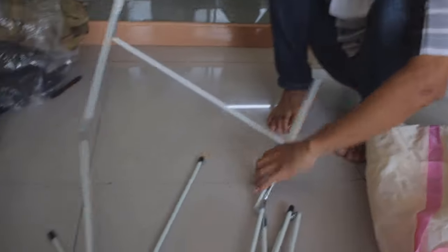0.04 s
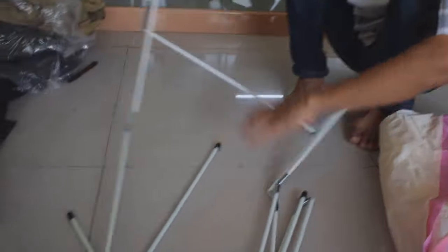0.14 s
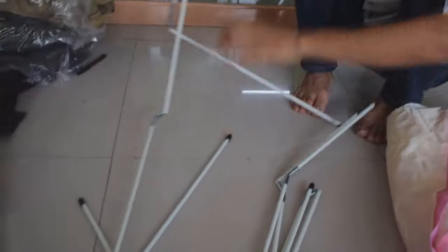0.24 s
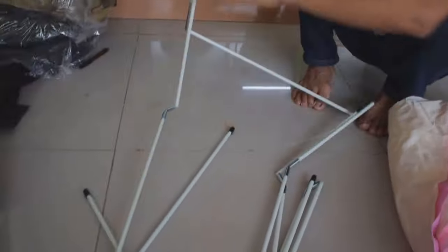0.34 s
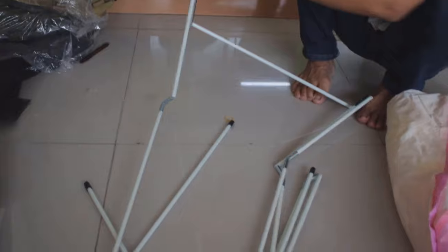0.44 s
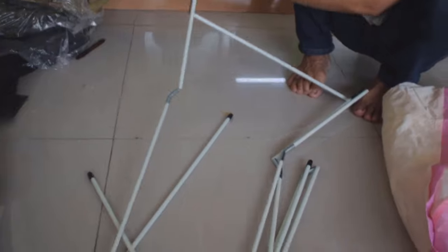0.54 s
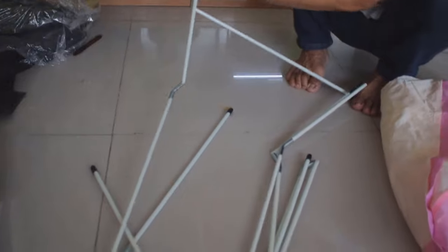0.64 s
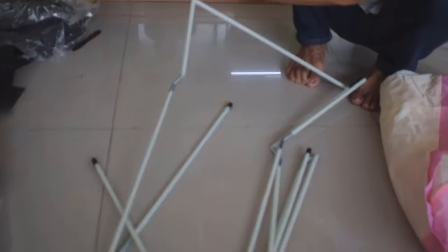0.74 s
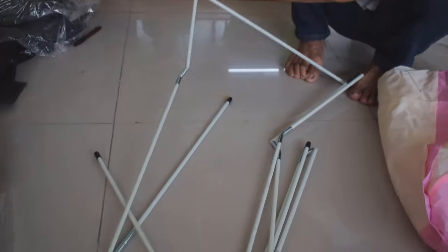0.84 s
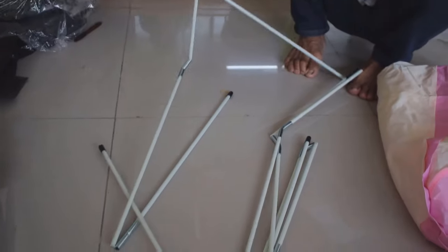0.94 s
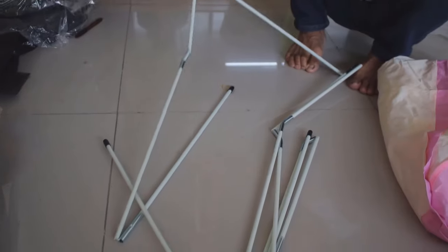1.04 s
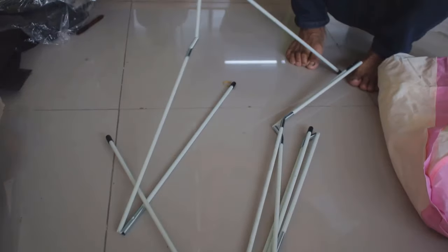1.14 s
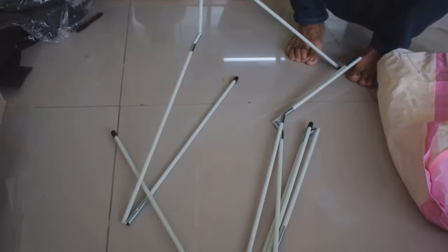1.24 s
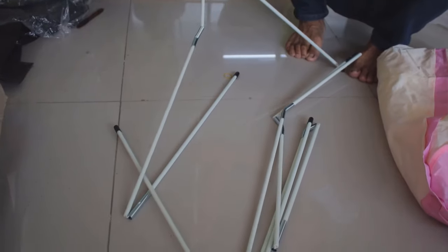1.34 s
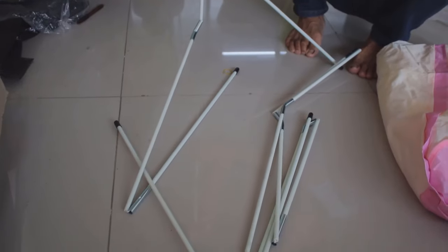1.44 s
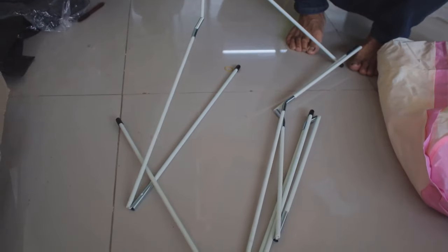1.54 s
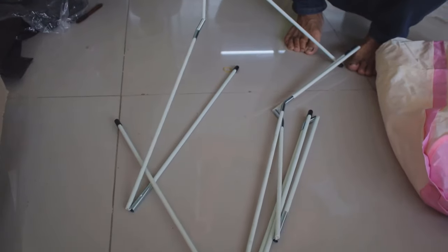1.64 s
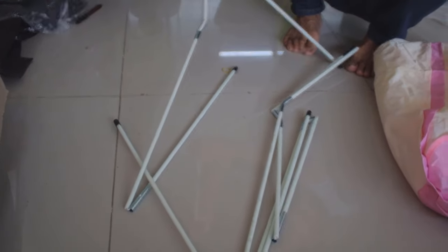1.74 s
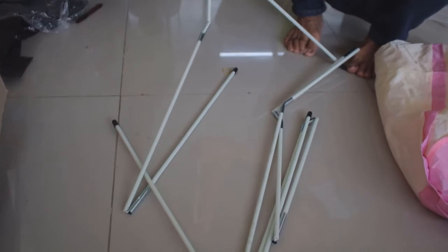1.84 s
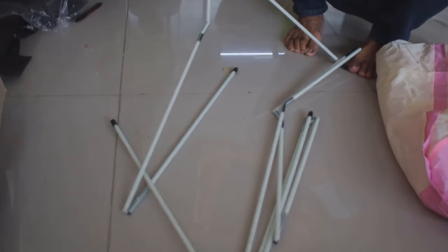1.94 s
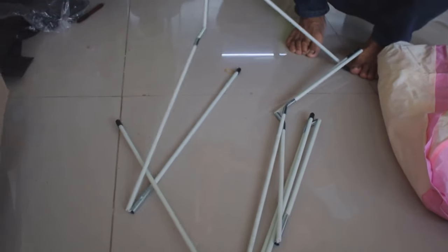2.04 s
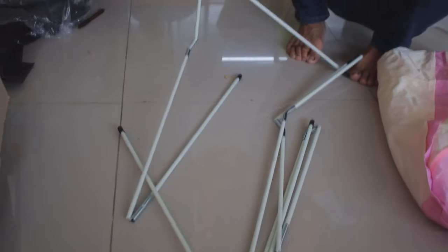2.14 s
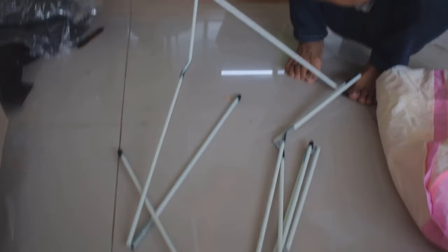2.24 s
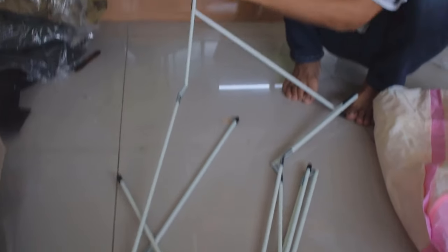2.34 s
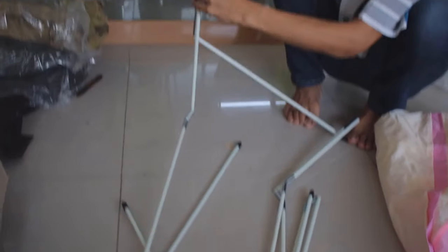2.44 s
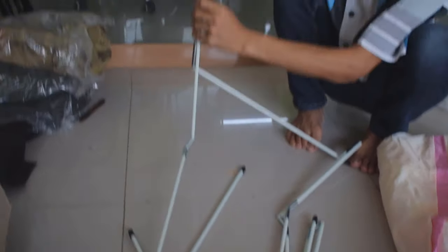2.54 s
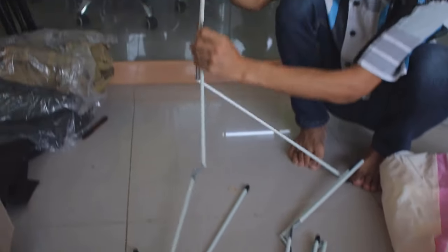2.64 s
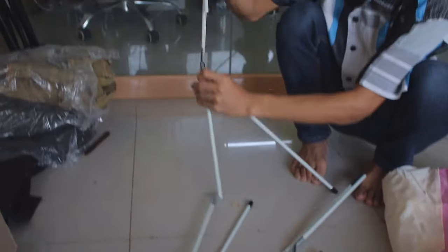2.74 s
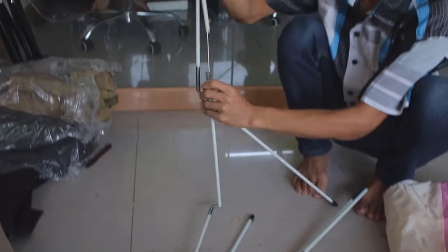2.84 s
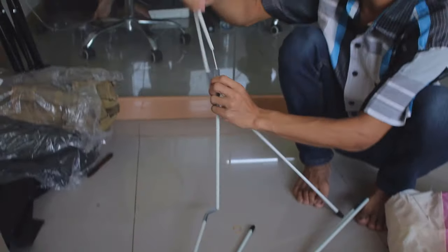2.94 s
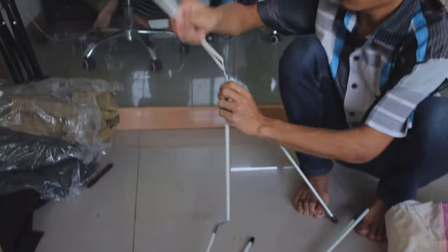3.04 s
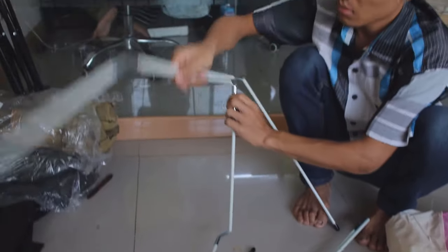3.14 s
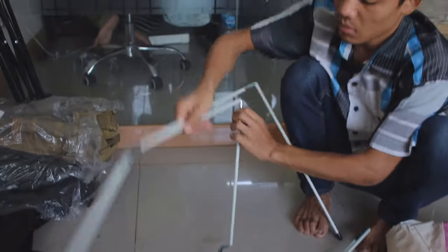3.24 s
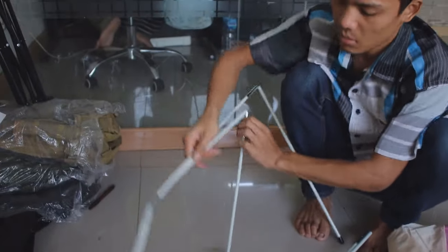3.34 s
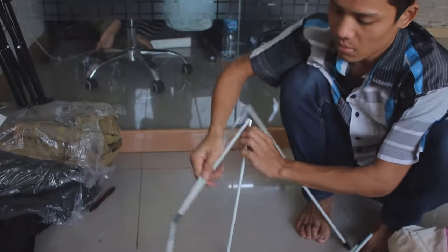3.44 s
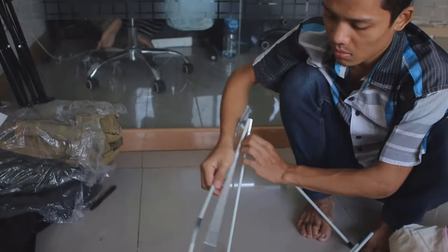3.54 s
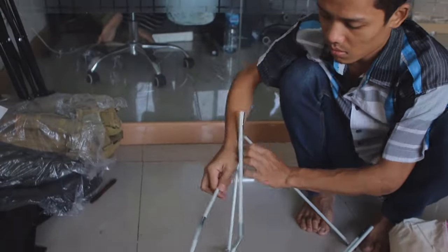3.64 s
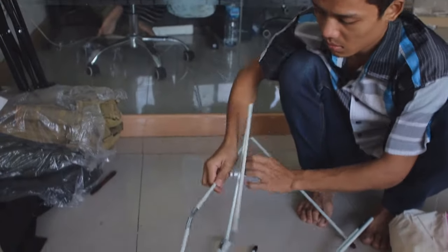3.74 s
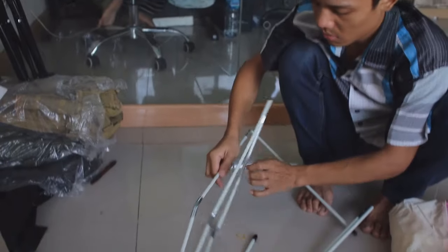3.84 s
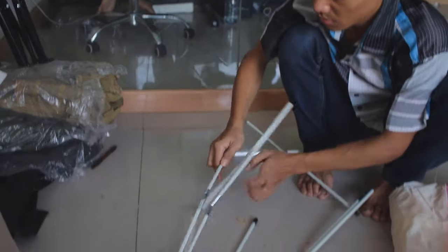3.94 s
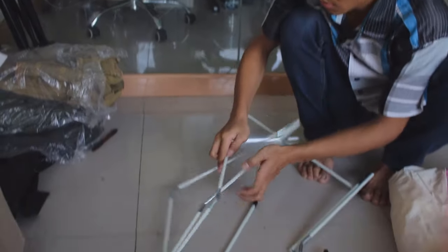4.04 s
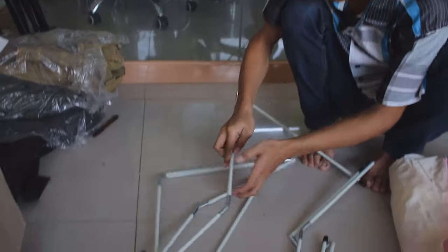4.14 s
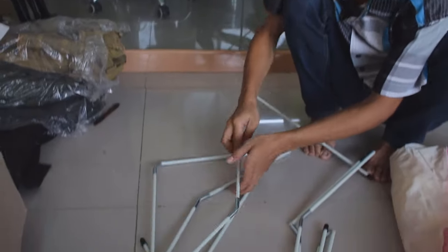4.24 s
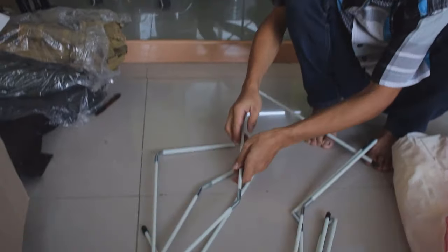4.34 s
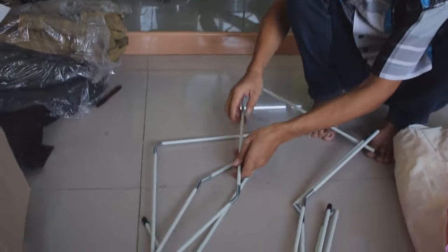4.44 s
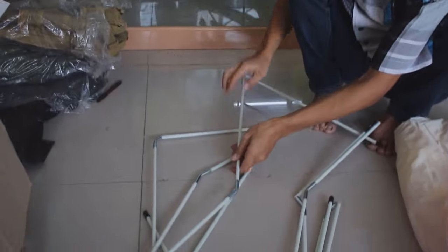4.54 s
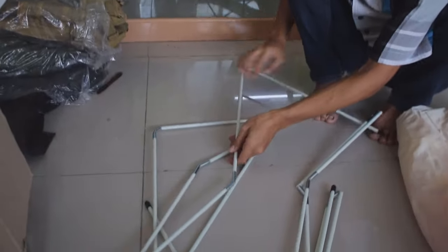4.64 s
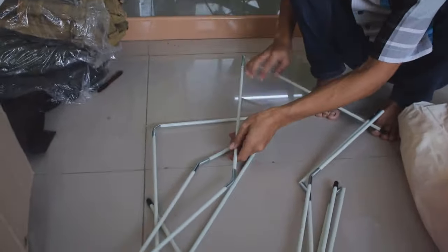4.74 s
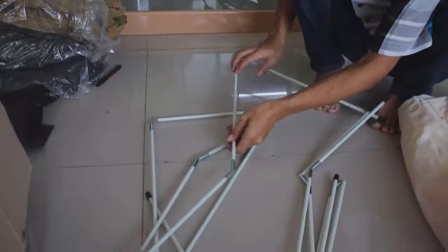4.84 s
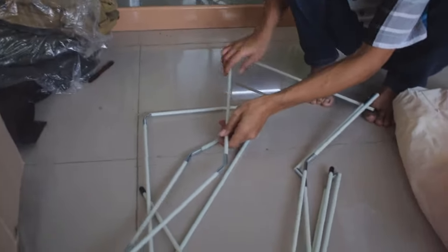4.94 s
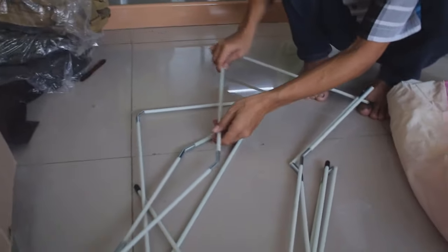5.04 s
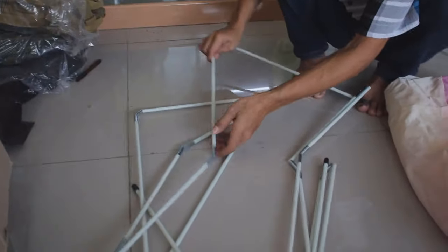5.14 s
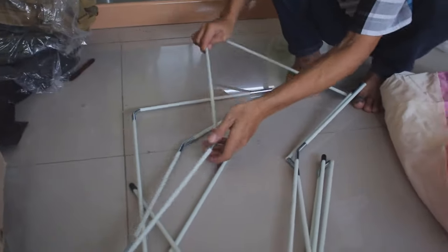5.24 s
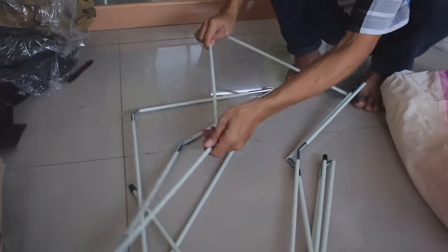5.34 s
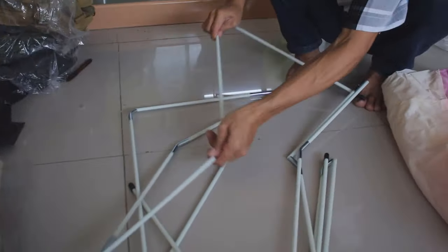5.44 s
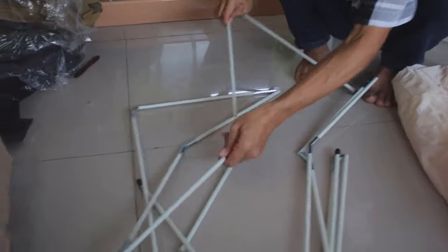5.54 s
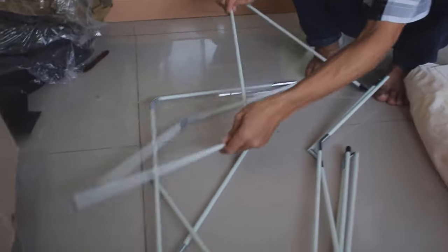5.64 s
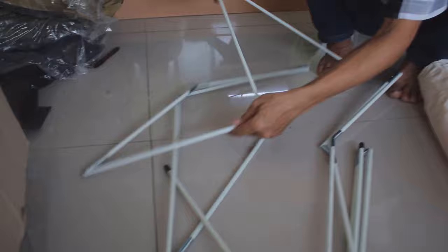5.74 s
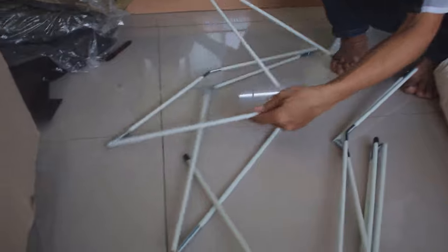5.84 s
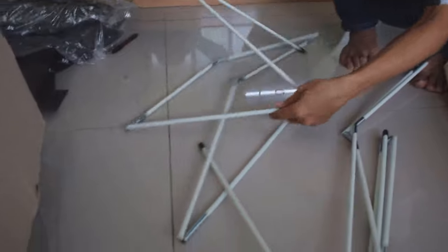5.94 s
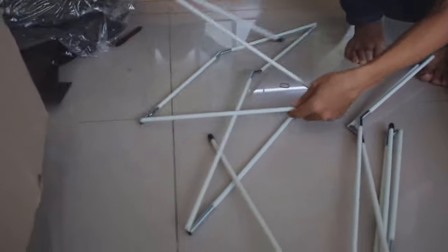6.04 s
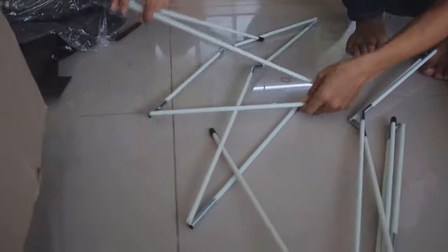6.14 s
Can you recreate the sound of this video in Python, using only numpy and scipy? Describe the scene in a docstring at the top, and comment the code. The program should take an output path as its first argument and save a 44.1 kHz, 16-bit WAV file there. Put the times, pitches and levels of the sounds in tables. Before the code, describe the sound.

Thin hollow rods click and rattle, go nearly quiet, then crash together in sharp bursts on a tiled floor above faint motor-like humming.

```python
"""In a hard, echoing room with a tiled floor, jointed fibreglass poles with metal sleeves knock together.
Knocks, floor thumps and a loose rattle come from impulsive contacts exciting modal resonators; sleeves ring on.
A wavering harmonic series makes a low motor-like hum, and filtered noise makes the room noise.
A mono microphone with a fast gain control and overload picks it up."""
import sys
import numpy as np
from scipy import signal
from scipy.fft import rfft, irfft
from scipy.io import wavfile

SR = 44100
rng = np.random.default_rng(int(sys.argv[2]) if len(sys.argv) > 2 else 0)


def volts_from_db(level):
    """Convert decibel levels to linear amplitude ratios."""
    exponent = np.asarray(level, float) / 20
    return 10 ** exponent


def store_wav(level_fs):
    """Save 16-bit WAV to argv[1]."""
    pcm = np.round(np.clip(np.atleast_2d(level_fs), -1, 1) * 32767)
    wavfile.write(sys.argv[1], SR, pcm.T.astype(np.int16))


N = 272626


def rms_one(x):
    """Normalisation: scale a signal to an rms of 1."""
    return x / np.sqrt(np.mean(x ** 2) + 1e-20)


def in_time(rows):
    """Linear interpolation: read the columns of a timed table sample by sample."""
    seconds, *columns = np.transpose(rows)
    return [np.interp(np.arange(N) / SR, seconds, column) for column in columns]


def at_hz(points, hz):
    """Interpolation on a logarithmic frequency axis: read a (Hz, value) line."""
    points = np.array(points)
    return np.interp(np.log(hz), np.log(points[:, 0]), points[:, 1])


def drift(rate_hz):
    """Slow random modulation: noise through two equal one-pole low-passes, scaled to rms 1."""
    thin = 40  # one drawn value for every 40 samples
    r = np.exp(-2 * np.pi * thin * rate_hz / SR)
    noise = rng.standard_normal(N // thin + 2002)
    slow = signal.lfilter([1], [1, -2 * r, r * r], noise)[2000:]
    return np.interp(np.arange(N) / thin, np.arange(len(slow)), rms_one(slow))


def ring(clicks, hz, width_hz):
    """Damped resonance: two poles, with zeros at 0 Hz and SR / 2; a unit click rings at height about 1."""
    r = np.exp(-np.pi * width_hz / SR)
    w = 2 * np.pi * hz / SR
    return signal.lfilter([.5, 0, -.5], [1, -2 * r * np.cos(w), r * r], clicks + 1e-18)


def coloured(x, spectrum):
    """Linear filtering in the frequency domain: shape a sound by a (Hz, dB) line."""
    hz = np.maximum(np.fft.rfftfreq(len(x), 1 / SR), 1)
    return irfft(rfft(x) * volts_from_db(at_hz(spectrum, hz)), len(x))


# Course of the hum. Each row: time in seconds, rms level in dB before flutter.
HUM_LEVEL = [(0.0, -50), (0.3, -35), (1.22, -47), (2.62, -32.5), (4.1, -42.5), (4.41, -37.5), (5.6, -33.5),
             (6.18, -26)]
# Harmonics of the hum. Each row: multiple of the fundamental, relative level in dB.
HUM_ORDERS = [(1, -7.5), (2, -2), (3, -9), (4, -11), (5, -12.5), (6, -9)]


def hum(level_db, centre_hz=60.25, waver=0.03055, flutter_db=4.5, rough_rad=1.0):
    """Harmonic synthesis: a wavering fundamental whose orders each swell and roughen on their own."""
    phase = 2 * np.pi * np.cumsum(centre_hz * (1 + waver * drift(3.54))) / SR
    drone = np.zeros(N)
    for multiple, db in HUM_ORDERS:
        swell = volts_from_db(db + flutter_db * drift(6.8))
        drone += swell * np.sin(multiple * phase + rough_rad * drift(12))
    return volts_from_db(level_db) * rms_one(drone)


# Spectrum of the room noise. Each row: frequency in Hz, relative level in dB per Hz.
AIR_SPECTRUM = [(18, -31), (30, -14), (59, -37), (144, -21), (178, -7.5), (352, -6.5), (609, -4.5),
                (792, -54), (3010, -12), (15700, -95)]


def room_noise(mean_db=-40, sway_db=2.5):
    """Coloured noise: a random signal shaped by a spectrum, its level swaying slowly."""
    air = rms_one(coloured(rng.standard_normal(N), AIR_SPECTRUM))
    return volts_from_db(mean_db + sway_db * drift(8.8)) * air


# Steady handling of the bundle.
# Each row: time in seconds, middle-mode level in dB, extra level of the high modes in dB.
HANDLING = [(0.0, -18.5, -5.5), (0.45, -35.5, 4), (0.72, -36.5, 5), (1.1, -40, -7), (1.285, -36.5, 3),
            (1.4, -44, -3), (1.9, -49, 5), (2.2, -41.5, 2), (2.43, -40.5, 9), (2.58, -32, 3),
            (2.72, -29.5, -6), (3.26, -35.5, 4), (3.44, -29, -18), (3.87, -38.5, -5), (4.1, -26.5, -9),
            (4.9, -31, -26), (5.16, -31.5, -20), (5.3, -28, -7), (5.5, -24, -6), (6.18, -16.5, -14)]
# Bursts of clatter as rods tumble or are dragged.
# Each row: start in seconds, time from start to decay in seconds, levels of low, middle and high modes in dB.
BURSTS = [(0.0, 0.013, -29, -20.5, -31), (0.254, 0.078, -34.5, -24, -40), (0.806, 0.014, -22.5, -24.5, -31),
          (2.799, 0.065, -22, -15, -23), (3.471, 0.092, -6.5, -7.5, -5), (3.624, 0.32, -28, -42, -43),
          (3.879, 0.013, -16.5, -48, -54), (4.212, 0.082, -17.5, -6.5, -7.5),
          (4.298, 0.089, -14.5, -3.5, -6.5), (5.812, 0.074, -26.5, -18.5, -14),
          (5.928, 0.143, -14.5, -6, -11), (6.143, 0.1, -20, -12.5, -19)]


def bustle(pivot_db=-35, rise_s=0.01, fall_db_per_s=169.5):
    """Power addition of incoherent sources: levels of three mode groups from handling and bursts."""
    middle_db, bright_db = in_time(HANDLING)
    above_db = middle_db - pivot_db
    low_db = -36 + 0.53 * above_db
    high_db = -40.5 + 1.8 * above_db + bright_db  # stronger handling is brighter
    power = volts_from_db([low_db, middle_db, high_db]) ** 2
    for start_s, hold_s, *modes_db in BURSTS:
        t = np.arange(N) / SR - start_s
        fall = volts_from_db(-fall_db_per_s * np.maximum(t - hold_s, 0))
        shape = np.clip(t / rise_s, 0, 1) * fall
        power = power + (volts_from_db(modes_db)[:, None] * shape) ** 2
    return 10 * np.log10(power)


# Modes of rods and sleeves, which the knocks excite as well.
# Each row: frequency in Hz, bandwidth in Hz, relative level in dB.
POLE_MODES = [(437, 320, -3.5), (659, 316, -1.5), (1006, 242, 0), (1250, 250, -4), (1500, 283, -5.5),
              (1950, 1050, 6), (2606, 280, -10), (3129, 890, 2.5), (4033, 710, 2), (4750, 480, -7.5),
              (5316, 620, 1), (5990, 1040, 8.5), (6906, 220, -1.5), (7590, 280, -1), (8270, 98, -7.5),
              (8970, 153, -6.5), (9590, 244, -9), (11930, 190, -12.5), (11850, 410, -51), (12750, 400, -28)]


def rattle(low_db, middle_db, high_db, base_per_s=500, clump_db=3.5, shared=0.31):
    """Shot excitation of modes: dense uneven contacts ring the poles in low, middle and high groups."""
    drag = np.clip((middle_db + 30) / 20, 0, 1)  # a hard drag makes contacts denser and more even
    clumping_db = clump_db * (1 - 0.5 * drag) * drift(25)
    chance = base_per_s * volts_from_db(9.0 * drag + clumping_db) / SR  # of a contact at each sample

    def contacts():
        """Random impulses: a contact of random size and sign wherever chance allows."""
        size = volts_from_db(4 * np.minimum(rng.exponential(1, N), 4)) * rng.choice([-1, 1], N)
        return size * (rng.random(N) < chance)

    common = contacts()  # contacts that shake the whole pole at once
    groups = np.zeros((3, N))
    for hz, width_hz, db in POLE_MODES:
        group = np.searchsorted([1700, 5000], hz)
        groups[group] += volts_from_db(db) * ring(shared * common + contacts(), hz, width_hz)
    levels_db = (low_db, middle_db, high_db)
    return sum(volts_from_db(db) * rms_one(group) for db, group in zip(levels_db, groups))


# Decay of the room. Each row: frequency in Hz, time to fall by 60 dB in seconds.
ROOM_T60 = [(200, 0.74), (600, 0.42), (1500, 0.46), (4000, 0.31), (9000, 0.36), (14000, 0.084)]
# Early reflections from floor and walls. Each row: delay in seconds, level in dB.
ECHOES = [(.0045, -8), (.022, -13), (.028, -14), (.044, -15)]


def room(x, tail_db=-6.5, build_s=0.011, count=7):
    """Reverberation by convolution: hard echoes, then a dense tail that dies band by band."""
    t = np.arange(SR) / SR
    edges = 60 * 2 ** np.arange(0, 8.3, .5)  # half-octave bands
    white = rng.standard_normal((2, count, SR))  # neighbouring bands use different noise
    tails = 0
    for k, (low, high) in enumerate(zip(edges, edges[1:])):
        band_pass = signal.butter(2, [low, high], "band", fs=SR, output="sos")
        band = signal.sosfilt(band_pass, white[k % 2])
        tails = tails + band * volts_from_db(-60 * t / at_hz(ROOM_T60, np.sqrt(low * high)))
    tails = tails * (1 - np.exp(-(t / build_s) ** 2))
    tails = volts_from_db(tail_db) * tails / np.sqrt(np.sum(tails ** 2) / count)
    # rough surfaces blur an echo
    smears = rng.standard_normal((len(ECHOES), count, 16)) * np.exp(-np.arange(16) / 3)
    for (delay_s, db), smear in zip(ECHOES, smears):
        at = round(delay_s * SR)
        tails[:, at:at + 16] += volts_from_db(db) * smear / np.sqrt(np.sum(smear ** 2, axis=1, keepdims=True))
    # as the poles move, the paths change: every 6000 samples takes the next response
    place = np.arange(N) // 6000 % count
    return sum(signal.fftconvolve(x * (place == k), tail)[:N] for k, tail in enumerate(tails))


# Single knocks. Each row: start in seconds, peak level in dB, frequency of the added main ring in Hz,
# level of the dull modes near 1400 Hz in dB and of the bright modes near 7500 Hz in dB, against 3300 Hz.
KNOCKS = [(0.069, 13.5, 4890, 5, 12), (0.245, 7, 1600, -13, -19), (0.278, 10.5, 4750, -5, -7),
          (0.293, 8.5, 2190, -14, -25), (0.423, -8, 3500, -22, -38), (0.471, -7, 2140, -20, -21),
          (0.507, 0, 4454, -56, -19), (0.604, 4.5, 3100, -31, 0), (0.8, 8.5, 3305, -12, -9),
          (1.144, -2.5, 3670, -8, -6), (1.173, -10, 3220, -11, -14), (1.184, -2, 864, 7, -17),
          (1.288, -7.5, 3570, -30, -1), (1.676, -14.5, 1950, 2, -33), (2.069, -14.5, 5950, -7, -13),
          (2.188, -17, 6080, -20, 4), (2.286, -25, 8200, -22, 11), (2.39, -20, 6100, -28, 5.5),
          (2.426, -16.5, 4640, -25, 4), (2.53, 0.5, 7610, -17, -2), (2.666, 0, 4090, -30, -7),
          (2.704, -6.5, 9240, -12, 17), (2.726, -5.5, 1270, 4, -9), (2.798, 12.5, 4240, -16.5, -16),
          (2.858, 5, 1240, -6, 5), (2.88, 4, 4420, -13, -19), (3.026, -11, 4520, -34.5, -20),
          (3.144, 2, 4160, -7.5, -10), (3.292, 0, 3437, -47, -18), (3.443, 27.5, 7750, -21, -4),
          (3.491, 23.5, 990, 13, 8), (3.568, 22.5, 6390, 2.5, 0), (3.595, 13, 1450, -20, 3),
          (3.743, -6, 5300, 4, -19), (3.883, -5, 2210, 9.5, -33), (3.902, 0.5, 2286, 7.5, -19),
          (3.993, -3, 3420, -12, -32), (4.028, 0, 8400, -48, -16), (4.067, 2.5, 6080, -8, -8.5),
          (4.199, 24, 6450, -6, -2.5), (4.222, 0, 4600, -17, 9), (4.657, -9, 1820, 9, -5),
          (4.718, -2, 4020, -11, -14), (4.944, 1, 6530, -30, -5), (5.049, -0.5, 1790, -55, -14),
          (5.232, -6.5, 940, -32, -15), (5.255, -6.5, 960, -21, 1), (5.28, -17, 7600, -23, 3),
          (5.3, 5.5, 1850, -14, -26), (5.327, -6, 1780, -17, -28), (5.35, -3.5, 1850, -14, -27),
          (5.37, -8, 1850, -11, -22), (5.4, -7, 6200, -16, -1), (5.43, 5, 5260, -1, 5),
          (5.499, 5, 1010, -22, -8), (5.552, 2.5, 2670, -33, -24), (5.575, 4, 2580, -20, -9),
          (5.605, -13, 2500, -48, -27), (5.639, 0, 5750, -36, -15), (5.649, 5.5, 4750, -33, -13),
          (5.667, 5, 6050, -13, -3), (5.7, 4.5, 5280, -14, -14), (5.73, 0, 4560, -21, -3),
          (5.812, 14, 7080, -58, 1), (5.821, 7, 8000, -27, 2), (5.936, 20.5, 3330, -28, -8),
          (5.957, 19.5, 2480, -12, 16), (5.987, 10, 2600, -41.5, -1), (6.132, 22, 1500, -2, -14)]


def knocks(contact_s=0.0025, lag_s=.005, thud_db=-17.5, main_db=-2.5, main_width_hz=280, crack_db=-6):
    """Impact excitation and dispersion: chatter rings the modes; slower low bending waves arrive late."""
    size = 2048
    out, t = np.zeros(N + size), np.arange(size) / SR
    hz, width_hz, mode_db = np.transpose(POLE_MODES)
    for start_s, peak_db, main_hz, dull_db, bright_db in KNOCKS:
        tilt_db = at_hz([(600, thud_db), (1400, dull_db), (3300, 0), (7500, bright_db)], hz)
        gains = volts_from_db(mode_db + tilt_db + 3 * rng.standard_normal(len(hz)))
        chatter = rng.standard_normal(size) ** 3 * np.exp(-t / contact_s)
        # a dull blow is a longer contact, so its chatter is softer
        soft_hz = np.clip(3000 * 2 ** ((bright_db - dull_db + 30) / 10), 2500, 19000)
        chatter = signal.lfilter(*signal.butter(2, soft_hz, fs=SR), chatter)
        hit = volts_from_db(crack_db + bright_db) * np.diff(chatter, prepend=0)  # direct crack
        all_gains = np.r_[gains, volts_from_db(main_db) * gains.max()]
        for f, width, gain in zip(np.r_[hz, main_hz], np.r_[width_hz, main_width_hz], all_gains):
            slowness = np.sqrt(1500 / f) - np.sqrt(1500 / max(main_hz, 1.0))
            late = int(lag_s * SR * np.clip(slowness, 0, 1))
            hit[late:] += gain * ring(chatter, f, width)[:size - late]
        at = round(start_s * SR)
        out[at:at + size] += volts_from_db(peak_db) * hit / np.abs(hit).max()
    return out[:N]


# Soft hollow thumps of a rod laid on the floor.
# Each row: start in seconds, relative peak level in dB, mode frequency in Hz.
THUMPS = [(1.169, -7, 865), (1.209, -11, 580), (1.677, -22, 840), (2.857, -12, 510), (3.49, 9.5, 970),
          (3.881, 6, 960), (4.96, -9.5, 420), (4.985, -9.5, 516), (5.02, -8, 590), (5.048, -8.5, 910)]


def thumps(shudder_s=0.018, breadth=0.55, level_db=-4):
    """Heavily damped resonance: the rod shudders against the tiles and rings in one broad low mode."""
    size = 8192
    out, t = np.zeros(N + size), np.arange(size) / SR
    for start_s, db, hz in THUMPS:
        shudder = rng.standard_normal(size) * np.exp(-t / shudder_s)
        thump = ring(ring(shudder, hz, 2 * breadth * hz), hz, breadth * hz)
        at = round(start_s * SR)
        out[at:at + size] += volts_from_db(db + level_db) * thump / np.abs(thump).max()
    return out[:N]


# Thin long partials of a metal sleeve.
# Each row: frequency in Hz, level in dB, time to fall by 60 dB in seconds.
SLEEVE_PARTIALS = [(2590, -30, 1.5), (3050, -31, 1.3), (3440, -30, 1.5), (6500, -41, .9), (7200, -40, .9)]
# Blows on the sleeve. Each row: time in seconds, level in dB.
SLEEVE_HITS = [(1.188, 0), (5.301, -4)]


def sleeve():
    """Lightly damped free vibration: a few thin partials ring on after a knock."""
    clicks = np.zeros(N)
    for hit_s, db in SLEEVE_HITS:
        clicks[round(hit_s * SR)] = volts_from_db(db)
    # bandwidth is ln(1000) / (pi t60)
    return sum(volts_from_db(db) * ring(clicks, hz, np.log(1000) / np.pi / t60) for hz, db, t60 in SLEEVE_PARTIALS)


def scene():
    """Superposition: poles in the room over hum and room noise, the same in both channels."""
    poles = knocks() + thumps() + rattle(*bustle())
    high_pass = signal.butter(4, 290, "high", fs=SR, output="sos")
    poles = signal.sosfilt(high_pass, poles)  # thin rods radiate no bass
    mono = poles + room(poles) + sleeve() + hum(*in_time(HUM_LEVEL)) + room_noise()
    return np.array([mono, mono])


def low_pass(x):
    """Removes everything above the highest recorded frequency."""
    return signal.sosfilt(signal.butter(12, 15810, fs=SR, output="sos"), x)


def record(dry, limit_db=-9, top=1.4, lag_s=.012):
    """Gain control and saturation: gain follows power with a lag; first peaks slip past and are clipped."""
    r = np.exp(-1 / (lag_s * SR))
    power = signal.lfilter([(1 - r) ** 2], [1, -2 * r, r * r], np.minimum(dry[0] ** 2, 4.0))
    cut_db = np.maximum(10 * np.log10(power + 1e-12) - limit_db, 0)
    overloaded = top * np.tanh(dry * volts_from_db(-cut_db) / top)
    mix = np.clip(overloaded, -1, 1)
    return low_pass(mix)


dry = scene()
out = record(dry)
store_wav(out)
```